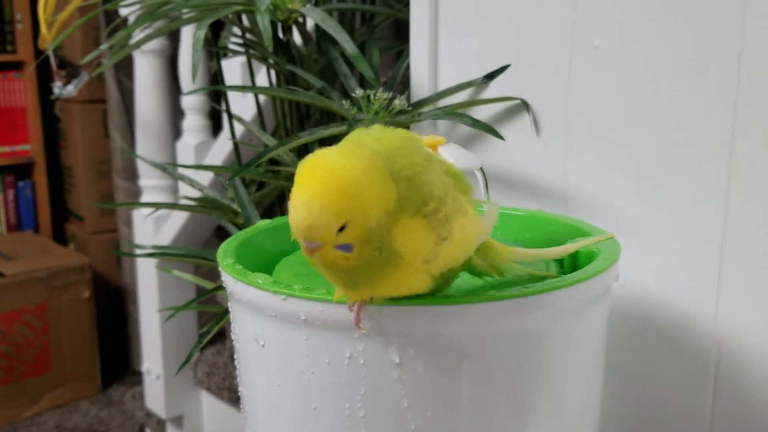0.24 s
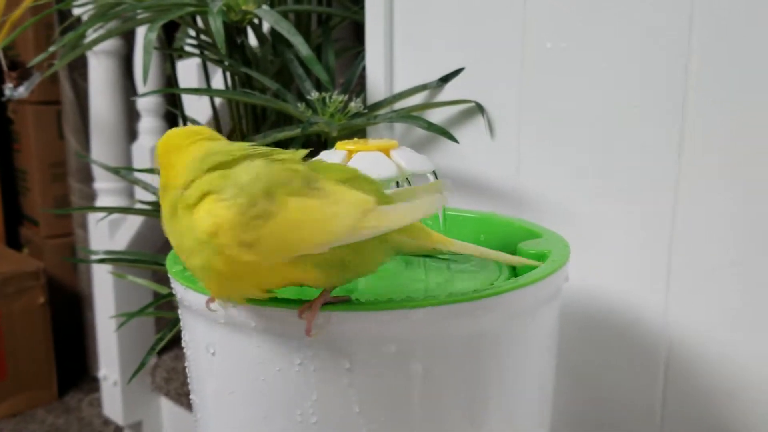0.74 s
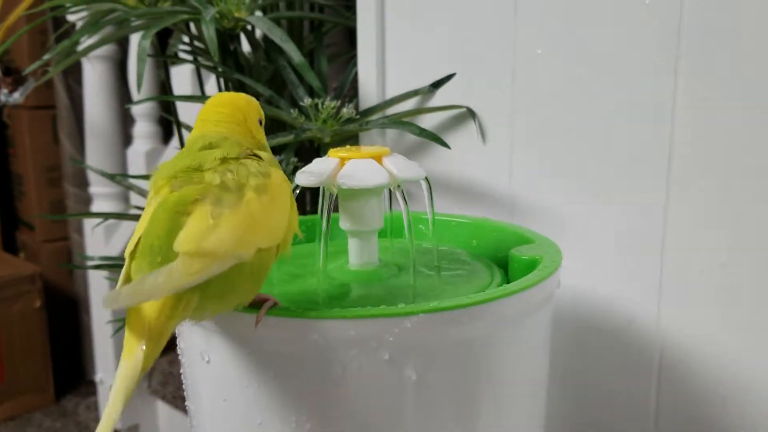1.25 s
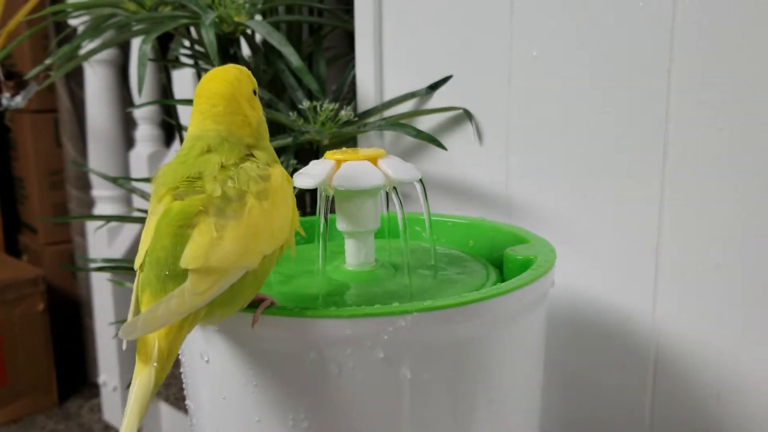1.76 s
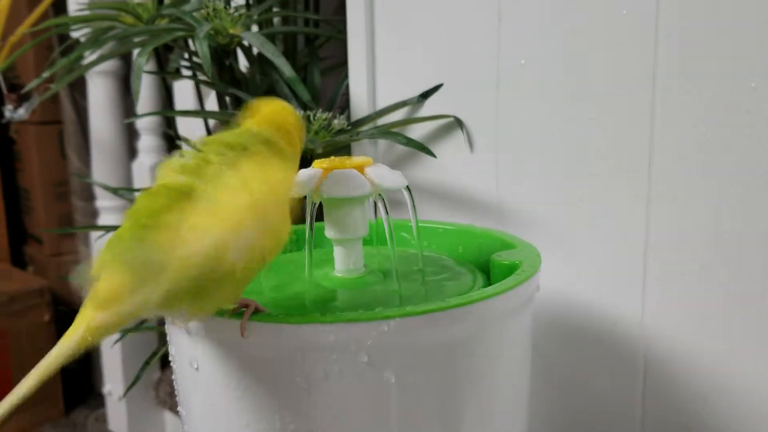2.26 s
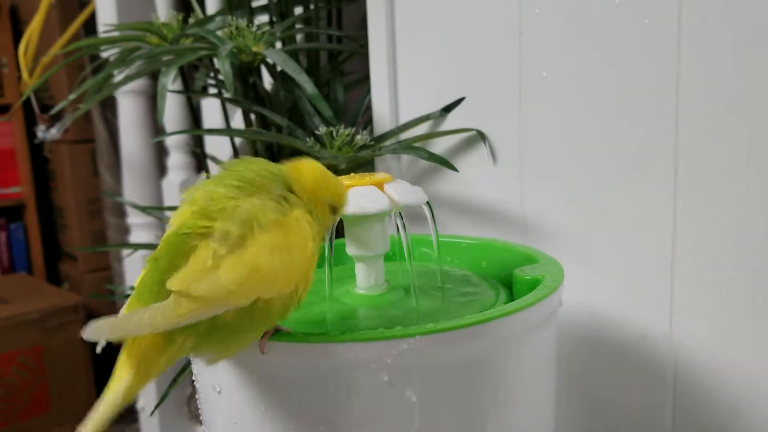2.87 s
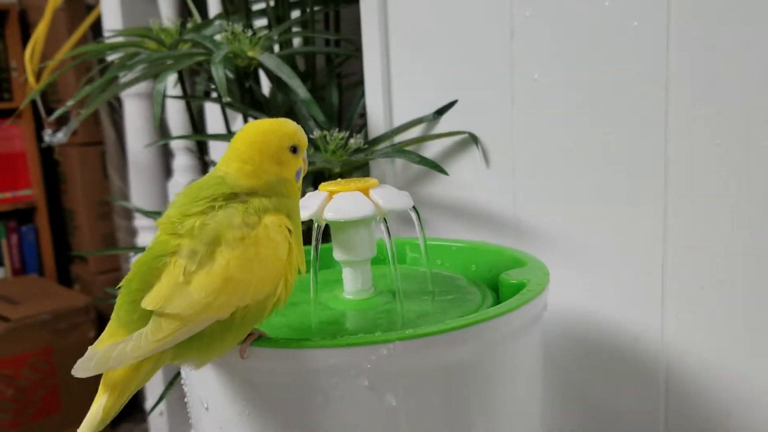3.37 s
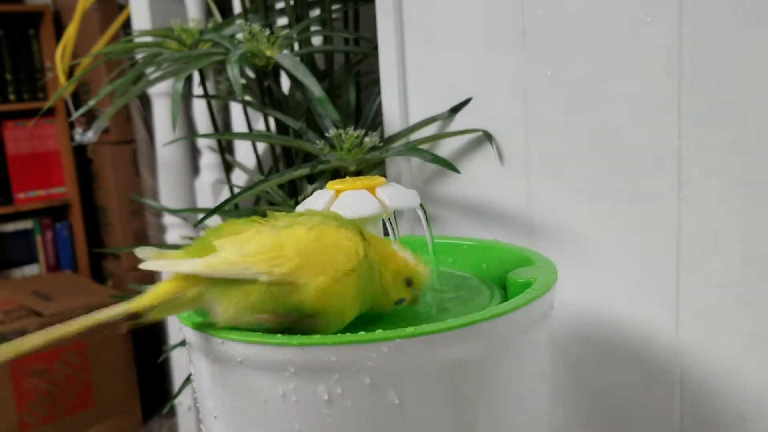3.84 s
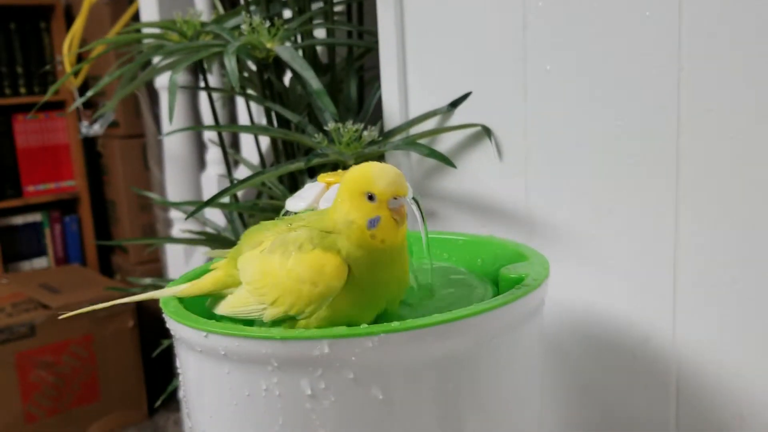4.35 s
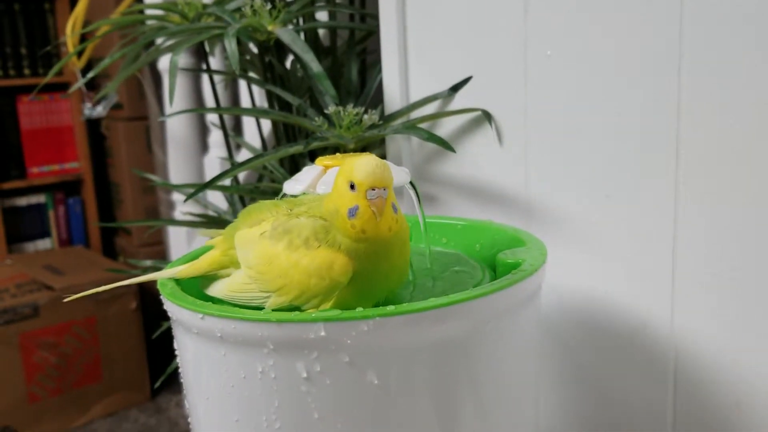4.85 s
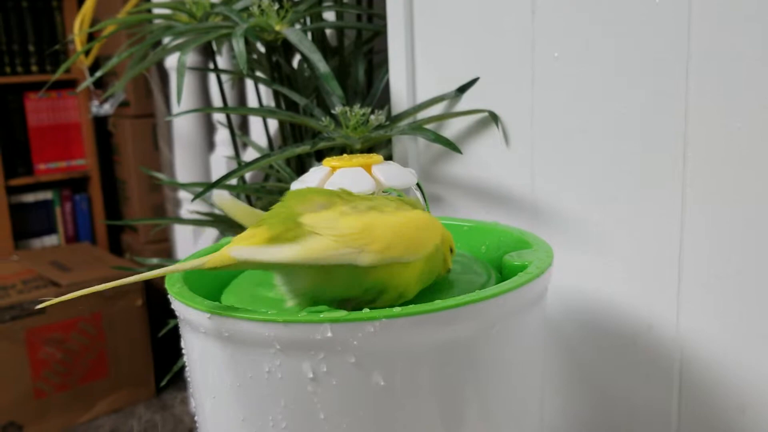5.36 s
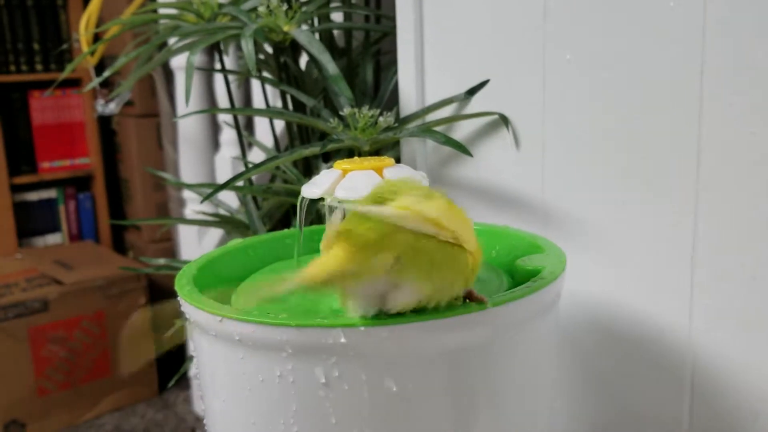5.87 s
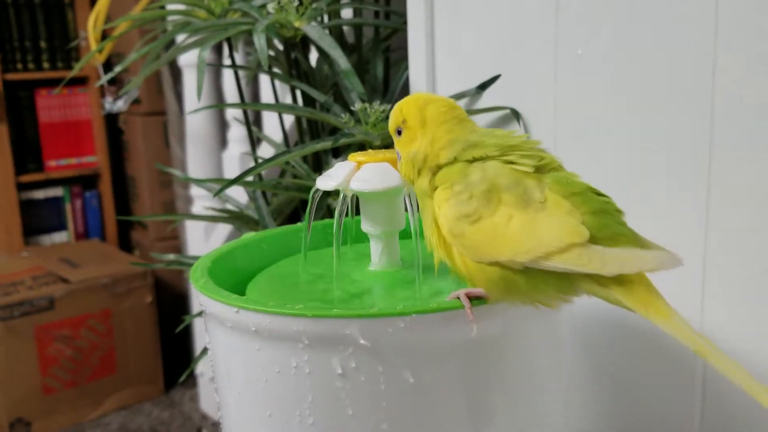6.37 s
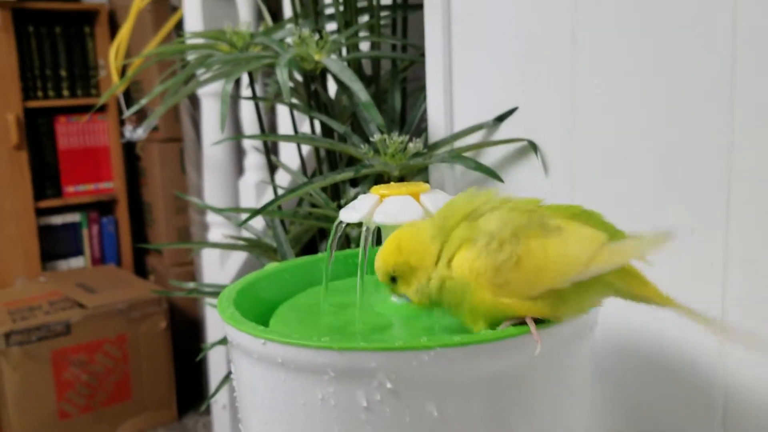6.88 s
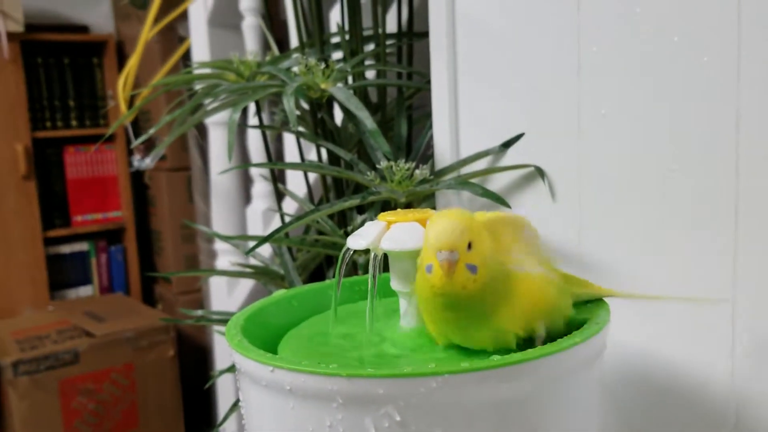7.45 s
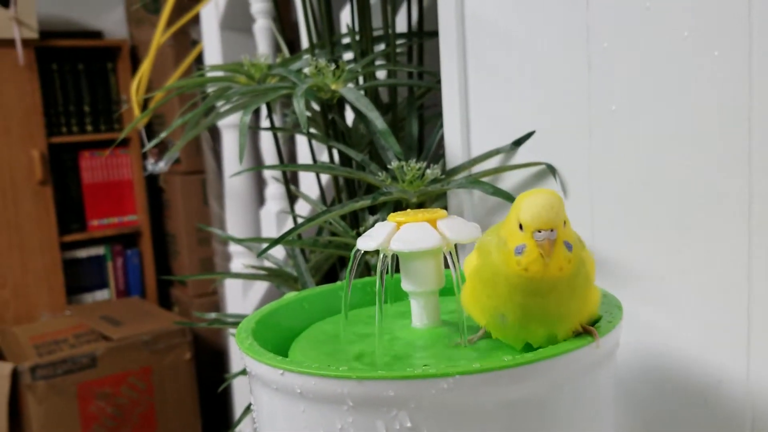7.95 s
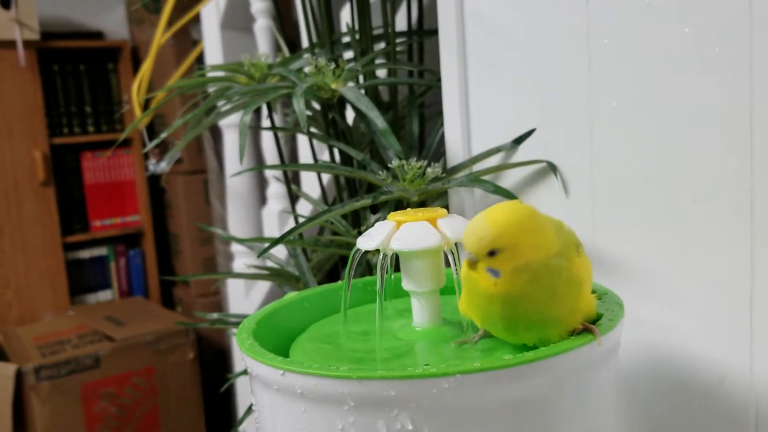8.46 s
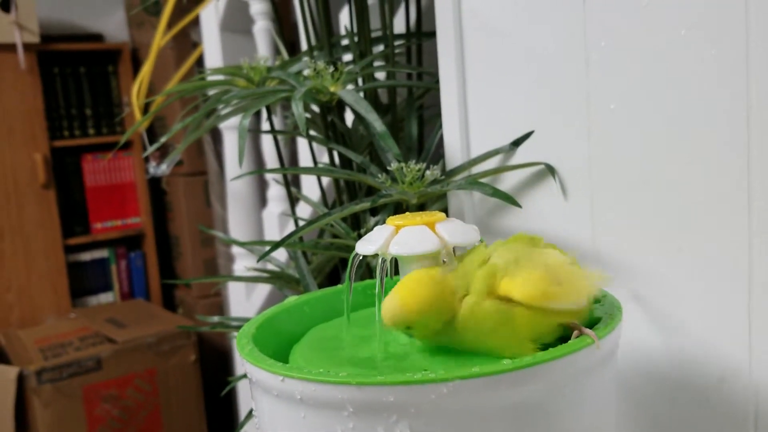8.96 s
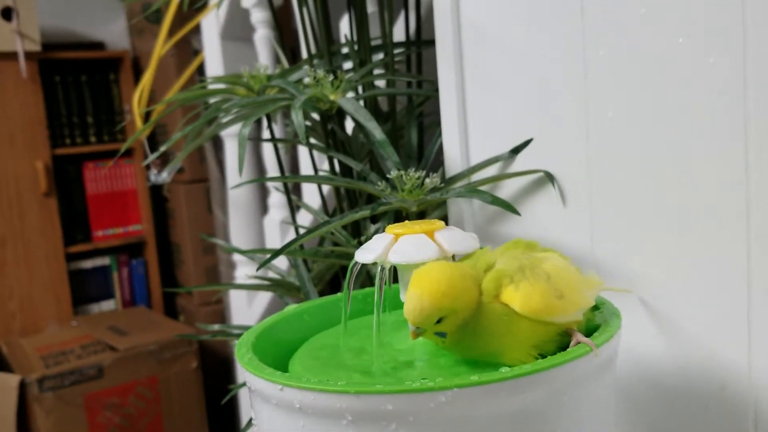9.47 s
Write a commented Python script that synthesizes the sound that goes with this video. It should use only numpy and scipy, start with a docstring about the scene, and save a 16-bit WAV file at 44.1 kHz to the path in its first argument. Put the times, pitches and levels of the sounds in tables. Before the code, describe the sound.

Close stereo pickup in a small, quiet room with faint pump hum and a delicate trickle. Crisp splashes surround a little parakeet's hoarse warble, sharp high chirps and airy rasps. After a short lull it scolds: buzzy, gritty squawks, spaced at first, then about five a second, thinner and brighter before dying away. A soft rasp follows, then splashing and drips grow as the background rises.

```python
"""A quiet room: a budgerigar warbles, then scolds in a fast even run of harsh squawks.
Whistled notes are near sines with two overtones; squawks and rasps are noise ringing throat and beak.
Water from a small fountain close by ticks, splashes and drips as noise bursts and short sines.
A pump hums over the room tone. Two microphone ports hear the bird off to one side, the left one late."""
import sys
import numpy as np
from scipy import signal
from scipy.fft import rfft, irfft
from scipy.io import wavfile
from scipy.ndimage import uniform_filter1d, minimum_filter1d, map_coordinates

SR = 44100
rng = np.random.default_rng(int(sys.argv[2]) if len(sys.argv) > 2 else 0)


def persist_wave(psi):
    """Save psi, clipped to +-1, as 16-bit WAV."""
    counts = np.round(np.clip(psi, -1, 1) * 32767).astype(np.int16)
    wavfile.write(sys.argv[1], SR, np.atleast_2d(counts).T)


def invert_db(level):
    """Linear amplitude ratio for a level in decibels (20 dB per decade), elementwise."""
    return 10 ** (np.asarray(level, dtype=float) / 20)


N = 428652

# resonances of the lower throat, shifted a little by each call: (frequency [Hz], width [Hz], level [dB])
LOWER_THROAT = [(1300, 400, -9.5), (3150, 330, -3), (3700, 330, 3.5), (4375, 610, 8)]
# level of the second overtone against the fundamental at the pivot pitch, by kind of note [dB]
SECOND_DB = dict(croak=7, hook=-24, tail=-12, twitter=-26)
# spectrum of splashing water: (frequency [Hz], relative density [dB per Hz])
WATER_SPECTRUM = [(4300, -34), (5000, -7), (6400, -6), (10000, -6), (14500, -7), (16500, -15)]
# background, low during the scolding and rising at the end: (time [s], level [dB])
BACKGROUND = [(0, -67), (.4, -62), (1.15, -69), (1.5, -73), (2.7, -65), (3.55, -64.5), (3.8, -77.5),
              (5.2, -75.5), (8, -81), (8.5, -75.5), (9.2, -63.5), (9.72, -52)]


def rms_one(x):
    """Scale to rms 1."""
    return x / np.sqrt(np.mean(x ** 2) + 1e-20)


def drift(rate, size):
    """Random wander of rms 1: noise through two equal low-pass poles at rate [Hz]."""
    r = np.exp(-2 * np.pi * rate / SR)
    noise = rng.standard_normal(size + 2000)
    return rms_one(signal.lfilter([1], [1, -2 * r, r * r], noise)[2000:])


def band(x, low_hz, high_hz):
    """Band-pass."""
    return signal.sosfilt(signal.butter(2, [low_hz, high_hz], "band", fs=SR, output="sos"), x)


def coloured(spectrum, channels):
    """Noise with a given spectrum, rms 1."""
    hz, level_db = np.transpose(spectrum)
    log_hz = np.log(np.fft.rfftfreq(N, 1 / SR) + 1)
    shape = invert_db(np.interp(log_hz, np.log(hz), level_db, left=-60, right=-60))
    return rms_one(irfft(rfft(rng.standard_normal((channels, N))) * shape, N))


def resonate(x, modes, shift):
    """Parallel resonances of alternating sign, their frequencies times shift; rms 1."""
    out = 0
    for k, (hz, width, level_db) in enumerate(modes):
        r = np.exp(-np.pi * width / SR)
        poles = [1, -2 * r * np.cos(2 * np.pi * hz * shift / SR), r * r]
        ringing = signal.lfilter([(1 - r * r) / 2, 0, (r * r - 1) / 2], poles, x)
        out = out + (-1) ** k * invert_db(level_db) * ringing
    return rms_one(out)


def recoloured(modes):
    """The same resonances with chance strengths, 3 dB of spread."""
    return [(hz, width, level_db + 3 * rng.standard_normal()) for hz, width, level_db in modes]


def moving(air, modes):
    """The throat shifts during a call: a blend from one chance setting to another, on average higher."""
    rise = .06   # share by which the resonances climb, on average
    share = np.linspace(0, np.pi / 2, len(air))
    first, last = [resonate(air, recoloured(modes), 1 - rise * (.5 - end) + .025 * rng.standard_normal())
                   for end in range(2)]
    return np.cos(share) * first + np.sin(share) * last


def throbbing_breath(t, length, rate, blur):
    """The syrinx chops the breath into uneven puffs; a steady leak grows and blurs them."""
    throbs_per_s = rate * np.exp(.06 * rng.standard_normal())
    turns = np.cumsum(throbs_per_s * (1 + .08 * drift(60, len(t)))) / SR
    puff_strength = invert_db(rng.normal(0, 1.8, 64))[turns.astype(int) % 64]
    puff = np.sin(np.pi * (turns % 1) ** .6) ** 2 * puff_strength
    leak = .04 + blur * np.minimum(t / length, 1) ** .7
    return turns, puff / (.6 + leak), leak / (.6 + leak)   # the same breath, shared out


def squawks():
    """Gritty air, chopped by the syrinx, rings throat and beak; a low rumble under the loud squawks."""
    # scolding squawks: (start [s], length [s], level [dB], rumble re level [dB], upper throat [dB],
    # blur of the throbs [0-2])
    scold_rows = [(0.627, 0.019, -16, -23.5, -2, 1), (1.281, 0.056, -4.5, -23, 0, 1.6),
                  (4.035, 0.087, -9, -25, 0, 1.4), (4.384, 0.081, -9.5, -28.5, -2.5, 1.1),
                  (4.656, 0.078, -13, -32, -1, .8), (4.873, 0.069, -12.5, -35, -1, 1.3),
                  (5.292, 0.071, -13, -42, 4, .5), (5.461, 0.074, -13.5, -51, 2, .6),
                  (5.634, 0.079, -11, -32.5, 2, .6), (5.827, 0.07, -9.5, -25, 3, 1.4),
                  (6.034, 0.059, -10, -27.5, 3.5, 1.3), (6.241, 0.073, -9.5, -26, 2.5, 1.5),
                  (6.46, 0.077, -11, -26.5, 2.5, .6), (6.691, 0.06, -12.5, -27, 2, .8),
                  (6.898, 0.062, -11, -26, 2.5, 1.3), (7.084, 0.072, -10, -28, 4.5, .35),
                  (7.317, 0.073, -13, -53, 5, .15), (7.532, 0.071, -15, -60, 4.5, .15),
                  (7.73, 0.081, -16, -76, 3.5, .15), (7.948, 0.089, -20, -69, 2.5, .6)]
    # darker chatter under the warble, without rumble: (start [s], length [s], level [dB], upper throat [dB])
    chatter_rows = [(0.391, 0.063, -31.5, 0), (0.439, 0.11, -31.5, -10), (1.19, 0.024, -14.5, -17),
                    (1.258, .035, -11.5, -14), (2.651, 0.066, -15, -15), (2.8536, 0.005, -8, -21.5),
                    (3.576, 0.044, -11.5, -7), (3.707, 0.1, -20.5, -12)]
    # upper throat resonances before shift and recolouring: (frequency [Hz], width [Hz], level [dB])
    upper_throat = [(5050, 950, 15), (5950, 850, 15), (6800, 1200, 6)]
    # beak resonances, lowered to 0.94 of this: (frequency [Hz], width [Hz], level [dB])
    beak_hiss = [(8840, 730, 7), (9640, 11000, -2.5)]
    opening_db, swell_db = -10, -3   # upper throat and whole call at the start, while still shut
    release_s, release_db, release_t60_s = .025, -14.5, .1
    rumble_own = .8   # rumble noise of each port's own, against the common part

    # columns: start, length, level, upper throat, rumble amplitude, opening time [s], throbs per s, blur
    calls = [(s, length, db, upper_db, invert_db(rumble_db), .2 * length, 165, blur)
             for s, length, db, rumble_db, upper_db, blur in scold_rows]
    calls += [row + (0, .004, 140, .3) for row in chatter_rows]

    out, low = np.zeros(N), np.zeros((2, N))
    for s, length, level_db, upper_db, rumble_gain, opens, rate, blur in calls:
        t = np.arange(int((length + .06) * SR)) / SR
        turns, puff, leak = throbbing_breath(t, length, rate, blur)
        # a bright scold opens with a weak tick
        bright_scold = (upper_db > -8) & (rumble_gain > 0) & (length > .04)
        first = np.where((turns < 1) & bright_scold, invert_db(-6), 1)
        after = invert_db(release_db - 60 * np.maximum(t - length, 0) / release_t60_s) * (length > .01)
        fade = np.maximum(np.clip((length - t) / release_s + .5, 0, 1) ** 2, after)
        shut = np.exp(-t / opens)

        grit = invert_db(2.5 * drift(900, len(t)))   # the air comes in uneven grains
        air = rng.standard_normal(len(t)) * (puff + leak) * grit
        upper_gain = invert_db(upper_db + opening_db * shut)
        throat = moving(air, LOWER_THROAT) + upper_gain * moving(air, upper_throat)
        hiss = resonate(rng.standard_normal(len(t)) * (puff + 3.2 * leak), beak_hiss, .94)
        hiss_gain = invert_db(-11 + .68 * upper_db + opening_db * shut)   # follows the upper throat
        voice = rms_one(band(throat, 1200, 12000)) + hiss_gain * hiss

        common, *own = rng.standard_normal((3, len(t))) * (puff + leak)
        rumble = band(common + rumble_own * np.array(own), 274, 1800)
        rumble = rms_one(band(rumble, 73, 5800))
        rumble_swell = np.sin(np.pi * np.minimum(t / length, 1))   # fullest mid-call

        at = slice(int(s * SR), int(s * SR) + len(t))
        out[at] += invert_db(level_db + swell_db * shut) * first * fade * voice
        low[:, at] += invert_db(level_db) * rumble_gain * rumble_swell * rumble
    return out, low


def croaks():
    """Low hoarse notes whose pitch bends late, as note phrases."""
    # (start [s], length [s], first pitch [Hz], last pitch [Hz], peak level [dB])
    croak_rows = [(0.505, 0.039, 1689, 1207, -19.5), (0.714, 0.03, 1250, 1960, -50.5),
                  (1.562, 0.032, 1650, 1320, -44), (2.928, 0.028, 1500, 1210, -33),
                  (2.965, .045, 2143, 1800, -25.5), (3.012, 0.026, 1345, 734, -36.5)]
    peak_share, bend_power, flutter_db = .57, 2.5, 5
    share = np.array([0, peak_share, .7, .85, 1])
    swell_db = np.interp(share, [0, peak_share, 1], [-8, 0, -11])
    out = []
    for s, length, first, last, db in croak_rows:
        pitch = first + (last - first) * share ** bend_power
        out.append((SECOND_DB["croak"], flutter_db, np.c_[s + length * share, pitch, db + swell_db]))
    return out


def twitters():
    """A soft twitter, an arch of pitch and a spike, as note phrases."""
    # shape: (time from start [s], pitch before the arch factor [Hz], level re the twitter's [dB])
    twitter_shape = [(0, 1551, -8.5), (.032, 2624, -11.5), (.046, 3008, 1.5), (.056, 3130, -10),
                     (.088, 2140, -15), (.103, 1900, -27), (.126, 5000, -10), (.136, 4900, -18),
                     (.144, 2140, -5), (.157, 3320, -15)]
    # (start [s], level [dB], pitch factor of the arch [ratio])
    twitter_rows = [(1.417, -31, .93), (5.029, -41, 1.1)]
    out = []
    for s, db, arch in twitter_rows:
        rows = [(s + later, hz * (arch if 0 < k < 4 else 1), db + step)
                for k, (later, hz, step) in enumerate(twitter_shape)]
        out.append((SECOND_DB["twitter"], 2.6, rows))
    return out


def hooks():
    """Hooked chirps: a fast fall, a small rebound, then a low tail, as note phrases."""
    # (start [s], top pitch [Hz], bottom pitch [Hz], peak level [dB], tail level [dB])
    hook_rows = [(1.613, 4300, 2140, -25, -27.5), (1.681, 5200, 1960, -27.5, -30.5),
                 (1.748, 4130, 2040, -40.5, -38), (1.822, 2930, 1993, -41.5, -36.5),
                 (3.281, 3150, 1700, -35.5, -54), (3.346, 3950, 1960, -37, -38),
                 (3.414, 2920, 1780, -38, -43), (3.483, 2420, 1646, -36, -45.5)]
    fall_s, rebound_s, gap_s, tail_s = .015, .0079, .0018, .02
    knee, rebound, tail_first, tail_last = 1.3, 1.3, .79, .54   # pitches as shares of the bottom
    start_db, end_db, tail_end_db = -8.5, -14.5, -8
    out = []
    for s, top, bottom, db, tail_db in hook_rows:
        turn = s + fall_s
        end = turn + rebound_s
        hook = [(s, top, db + start_db),
                (s + fall_s / 2, bottom * knee, db + start_db / 2),
                (turn, bottom, db),
                (end, bottom * rebound, db + end_db)]
        tail = [(end + gap_s, bottom * tail_first, tail_db),
                (end + gap_s + tail_s, bottom * tail_last, tail_db + tail_end_db)]
        out += [(SECOND_DB["hook"], 3, hook), (SECOND_DB["tail"], 5.5, tail)]
    return out


def notes():
    """The syrinx whistles near sines with two overtones; pitch and level tremble, hoarser with flutter."""
    # loud warbled phrases: (second overtone at the pivot pitch [dB], flutter [dB],
    # rows of (time [s], pitch [Hz], level [dB]))
    warble_rows = [ (-15.5, 3.5, [(.39, 900, -29.5), (.397, 1620, -22.5), (.404, 1250, -22),
                   (.413, 1150, -26.5)]), (-6.5, 2, [(.407, 2450, -26.5), (.4105, 2450, -17.5),
                   (.418, 3000, -32)]), (-7, 7.2, [(.433, 3100, -29), (.447, 2000, -21.5),
                   (.461, 2950, -20), (.468, 2450, -9), (.48, 2162, -7.5), (.503, 1882, -13.5),
                   (.512, 2350, -14.5)]), (-25.5, 20, [(.512, 2450, -17.5), (.54, 2250, -21)]),
                   (-6, 1.7, [(.736, 1900, -48), (.747, 2640, -33), (.764, 2280, -42)]),
                   (4, 1.8, [(.764, 2090, -41.5), (.795, 1800, -42), (.812, 1150, -61.5)]),
                   (-20, 5.6, [(3.103, 3700, -35.5), (3.117, 3280, -41)]), (2, 3.5, [(1.174, 1800, -28.5),
                   (1.182, 1600, -19.5), (1.192, 1350, -25), (1.199, 850, -36.5), (1.21, 1400, -29.5)]),
                   (-14, 3.5, [(1.207, 2400, -18.5), (1.222, 4100, -5.5), (1.235, 2200, -12.5),
                   (1.242, 2450, -9.5), (1.257, 2400, -12), (1.261, 1880, -17.5), (1.268, 1780, -21)]),
                   (-8, 8.5, [(2.653, 3420, -11), (2.68, 3052, -13.5), (2.705, 3785, -14)]),
                   (-14, 5.9, [(2.705, 3050, -18), (2.735, 2600, -11), (2.765, 2400, -24.5),
                   (2.799, 2020, -27.5)]), (8.5, 6.8, [(2.8, 2100, -40.5), (2.82, 1800, -25),
                   (2.835, 1700, -29.5), (2.842, 1950, -33)]), (-36, 0.32, [(2.856, 4360, -6),
                   (2.863, 2835, -12), (2.868, 3100, -61.5)]), (-22, 3.3, [(2.953, 2940, -25),
                   (2.962, 3715, -13.5), (2.974, 2640, -21)]), (-14.5, 4, [(3.145, 3684, -33),
                   (3.151, 3970, -28), (3.16, 3426, -45), (3.169, 3500, -26.5), (3.18, 2300, -42.5),
                   (3.195, 2400, -42), (3.212, 1350, -41.5)]), (-22, 4.3, [(3.255, 1950, -63.5),
                   (3.278, 3150, -36)]), (-19, 1.8, [(3.68, 5000, -34), (3.691, 4900, -32.5),
                   (3.695, 5600, -12), (3.701, 5200, -7), (3.707, 5100, -21.5)]),
                   (-12.5, 16, [(3.708, 4400, -10.5), (3.72, 3300, -20.5), (3.727, 3700, -10.5),
                   (3.74, 4200, -7), (3.787, 4300, -7.5), (3.81, 4000, -23.5)]),
                   (-14.5, 5.7, [(3.7, 1346, -44.5), (3.716, 1430, -20), (3.732, 1900, -26.5),
                   (3.77, 2126, -23.5), (3.8, 1900, -48)])]
    pivot_hz, overtone_db_per_octave, third_under_db = 2000, -8, -8   # overtones fade as pitch climbs
    out = np.zeros(N)
    for pivot_db, flutter_db, rows in list(warble_rows) + croaks() + twitters() + hooks():
        s, hz, level_db = np.transpose(rows)
        at = np.arange(int(s[0] * SR), int(s[-1] * SR))
        t = at / SR
        pitch = uniform_filter1d(np.interp(t, s, hz), size=90)
        pitch = pitch * (1 + .004 * flutter_db * drift(200, len(t)))
        phase = 2 * np.pi * np.cumsum(pitch) / SR
        edge = np.clip(np.minimum(t - s[0], s[-1] - t) / .002, 0, 1)

        trembles = invert_db(.5 * flutter_db * np.tanh([drift(80, len(t)) for partial in range(3)]))
        trembles *= 1 + .045 * flutter_db * drift(300, len(t))   # hoarse side bands
        turns = np.cumsum(150 * invert_db(2 * drift(30, len(t)))) / SR + rng.random()
        throb_depth = np.clip(.11 * flutter_db, 0, .9)
        trembles *= 1 - throb_depth * np.cos(np.pi * turns) ** 2   # the syrinx throbs

        second_db = pivot_db + overtone_db_per_octave * np.log2(pitch / pivot_hz)
        third_db = np.minimum(second_db, 0) + third_under_db
        partials = invert_db([0 * t, second_db, third_db]) * np.sin(phase * [[1], [2], [3]])
        tone = (trembles * partials).sum(axis=0)
        out[at] += np.sqrt(2) * invert_db(np.interp(t, s, level_db)) * edge * tone
    return band(band(out, 650, 16000), 650, 16000)   # the notes carry nothing below about 650 Hz


def rasps():
    """Unvoiced air through the same throat, narrower beak, trembling a little; it swells, then fades."""
    # soft breathy rasps: (start [s], peak [s], end [s], peak level [dB],
    # share of the beak [0-1, held to .98], beak whistle [dB])
    rasp_rows = [(1.083, 1.12, 1.2, -24, 0.9, -7), (1.769, 1.89, 1.99, -32, 0.89, -6),
                 (2.172, 2.242, 2.34, -36, 1, -5), (2.699, 2.798, 2.9, -29, 0.68, -17),
                 (2.892, 2.972, 3.04, -28.5, 0.41, -15), (8.018, 8.209, 8.39, -34, 0.91, 6)]
    # narrowed beak, lowered to 0.99 of this: (frequency [Hz], width [Hz], level [dB])
    narrow_beak = [(6264, 1950, -13), (9700, 6200, -19.5)]
    start_db, fade_db_per_s = -12.5, -190
    out = np.zeros(N)
    for start, peak, end, level_db, beak_share, whistle_db in rasp_rows:
        at = np.arange(int(start * SR), int(end * SR))
        air = rng.standard_normal(len(at)) * invert_db(2.5 * drift(120, len(at)))
        beak_share = np.clip(beak_share, 0, .98)
        throat = resonate(air, LOWER_THROAT, .93)
        beak = resonate(air, [(5730, 220, whistle_db)] + narrow_beak, .99)
        voice = band(np.sqrt(1 - beak_share ** 2) * throat + beak_share * beak, 1300, 16000)
        swell_db = np.interp(at / SR, [start, peak, end], [start_db, 0, fade_db_per_s * (end - peak)])
        out[at] += invert_db(level_db + swell_db) * voice
    return out


def room(x):
    """Close broad reflections and a short bright tail of decaying noise, own in each port."""
    early_t60_s, early_db = .03, -7.5
    late_t60_s, late_db = .3, -25.5
    t = np.arange(int(.4 * SR)) / SR
    early, late = rng.standard_normal((2, 2, len(t)))
    early = band(early, 190, 16000) * invert_db(early_db - 60 * t / early_t60_s) / np.sqrt(early_t60_s)
    late = band(late, 4900, 7223) + 1.23 * band(late, 770, 21000)
    late = late * invert_db(late_db - 60 * t / late_t60_s) / np.sqrt(late_t60_s)
    # nothing returns in the first 2 ms; the root sets the decaying noise to its level in energy
    echo = (early + late) * (t > .002) * np.sqrt(4 * np.log(1000) / SR)
    return signal.fftconvolve(x[None], echo, axes=1)[:, :N]


def at_the_ports(bird):
    """The direct bird reaches the left port late; the lag wanders as the head turns."""
    # balance between the ports: (time [s], left minus right [dB])
    pan_rows = [(0, -7.5), (1.7, -2), (2.5, 2), (4, 0), (5.3, 4), (6.2, -1.5), (8, 1.5)]
    # arrival at the left port: (time [s], lag before the wander [s])
    lag_rows = [(.8, .00041), (2.6, 0.00029), (6.2, 0.0003232)]
    t = np.arange(N) / SR
    pan_db = np.interp(t, *np.transpose(pan_rows))
    lag_s = np.interp(t, *np.transpose(lag_rows)) + .00004 * drift(5, N)
    late = map_coordinates(bird, [(t - lag_s) * SR], order=5)
    return np.array([late * invert_db(pan_db / 2), bird * invert_db(-pan_db / 2)])


def splashes():
    """Each splash is a bright crackling burst of its own colour, wide in both ports, and a duller plip."""
    # (time [s], level before the offsets of spray and plip [dB], frequency of the colour [Hz])
    splash_rows = [(.038, -41, 6980), (.166, -40, 12360), (0.2525, -25, 11180), (0.3041, -22.5, 12900),
                   (0.3658, -21, 6070), (0.8027, -24.5, 6100), (0.8859, -32.5, 12990),
                   (1.0785, -26.5, 9270), (1.6621, -32, 8400), (2.0027, -33.5, 6020), (2.093, -34, 6330),
                   (2.1467, -34, 10020), (2.1786, -35, 11570), (2.3277, -34, 12500), (2.4517, -31, 6230),
                   (3.157, -23.5, 6100), (3.2081, -28.5, 10570), (3.3195, -33.5, 11260),
                   (3.4361, -29.5, 12060), (3.4624, -26.5, 6160), (3.5403, -30, 9590), (3.9109, -33, 5710),
                   (4.812, -35, 12600), (8.8218, -36, 5190), (8.8621, -31, 11500), (9.1766, -43.5, 7500),
                   (9.2223, -27, 10900), (9.325, -24.5, 12400), (9.3931, -23.5, 14430),
                   (9.4576, -33.5, 6650), (9.62, -34, 6350), (9.6767, -35, 6400)]
    spray_db, plip_db, plip_t60_s = -7, -34.5, .21
    bright, out = coloured(WATER_SPECTRUM, channels=2), np.zeros((2, N))
    for s, level_db, hz in splash_rows:
        size, pitch = rng.random(2)
        at = int(s * SR)
        t = np.arange(min(int(.12 * SR), N - at)) / SR
        rise = np.minimum(t / .00078, 1)
        spray = bright[:, at:at + len(t)]
        spray = .6 * spray + resonate(spray, [(hz, 1500, 0)], 1)
        spray_t60_s = .06 + .04 * size
        spray *= invert_db(spray_db - 60 * t / spray_t60_s + 3.5 * drift(300, len(t)))
        plip = resonate(rng.standard_normal(len(t)), [(1000 * 2.1 ** pitch, 250, 0)], 1)
        plip = invert_db(plip_db - 60 * t / plip_t60_s) * plip
        out[:, at:at + len(t)] += rise * invert_db(level_db) * (spray + plip)
    return out


def drips():
    """A drop rings briefly, sagging a little in pitch; others come by chance, following the background."""
    # single drips: (time [s], peak level [dB], pitch at the start [Hz])
    drip_rows = [(3.105, -46, 1724), (4.224, -43.5, 2154), (5.232, -53, 1452), (9.179, -42, 1977),
                 (9.323, -42.5, 810), (9.544, -43.5, 2520), (9.596, -41.5, 1300), (9.645, -34.5, 2020),
                 (9.659, -30.5, 1300), (9.677, -31.5, 1575)]
    small_per_s, small_over_background_db = 9, 14
    t60_s, sag_per_s = .045, -3
    out, t = np.zeros(N + SR), np.arange(int(.1 * SR)) / SR
    small_s = np.flatnonzero(rng.random(N) < small_per_s / SR) / SR
    spread, pitch = rng.random((len(small_s), 2)).T
    background_db = np.interp(small_s, *np.transpose(BACKGROUND))
    small_db = background_db + small_over_background_db - 10 * spread
    for s, peak_db, hz in drip_rows + list(zip(small_s, small_db, 900 * 4 ** pitch)):
        tone = np.sin(2 * np.pi * hz * (t + sag_per_s * t ** 2 / 2)) * np.minimum(t / .00066, 1)
        out[int(s * SR):int(s * SR) + len(t)] += invert_db(peak_db - 60 * t / t60_s) * tone
    return out[:N]


def background():
    """Room tone as coloured noise with a pump hum, and a faint flickering trickle of fine droplets."""
    # spectrum of the room tone: (frequency [Hz], relative density [dB per Hz])
    room_tone = [(50, -24), (100, -26.5), (200, -4), (400, -8.5), (715, -13), (1000, -20.5), (1300, -13.5),
                 (2500, -20.5), (5000, -19.5)]
    t = np.arange(N) / SR
    mid, side = coloured(room_tone, channels=2)
    hum = invert_db(-8.5) * np.sin(2 * np.pi * 119 * t)
    tone = mid + .7 * side * [[1], [-1]] + hum
    trickle = coloured(WATER_SPECTRUM, channels=2) * invert_db(5.5 + 6.5 * drift(60, N))
    level_db = np.interp(t, *np.transpose(BACKGROUND))
    trickle_db = np.minimum(level_db, -63.5)   # the trickle swells with the background up to here
    return invert_db(level_db) * tone + invert_db(trickle_db) * trickle


def scene():
    """Bird, its room, water and background."""
    harsh, rumble = squawks()
    bird = notes() + harsh + rasps()
    return at_the_ports(bird) + rumble + room(bird) + splashes() + drips() + background()


def band_limit(x):
    """A steep low-pass at the top of the band."""
    return signal.sosfilt(signal.butter(12, 15900, fs=SR, output="sos"), x)


def record(dry):
    """The deep bass is cut; then a fast limiter holds the peaks at full scale."""
    cut = signal.sosfilt(signal.butter(2, 70, "high", fs=SR, output="sos"), dry)
    allowed_gain = np.minimum(1, 1 / (np.abs(cut).max(axis=0) + 1e-9))
    gain = uniform_filter1d(minimum_filter1d(allowed_gain, size=61), size=61)
    return band_limit(cut * gain)


dry = scene()
out = record(dry)
persist_wave(out)
```